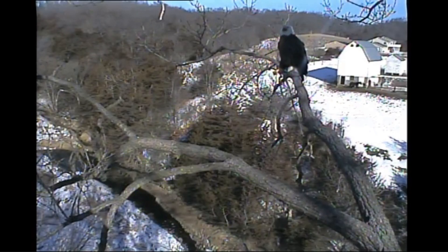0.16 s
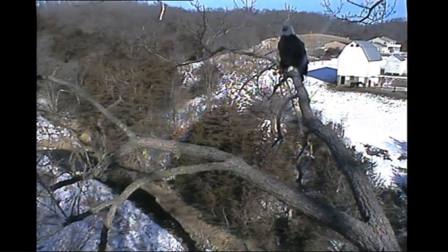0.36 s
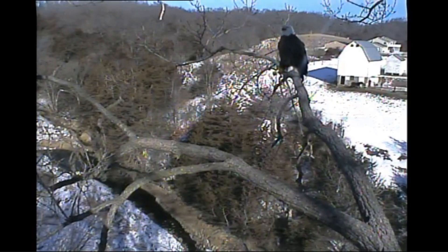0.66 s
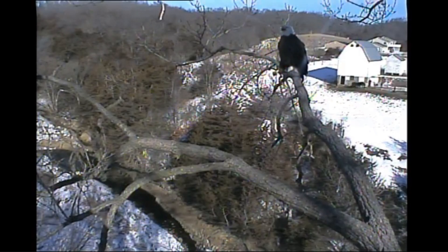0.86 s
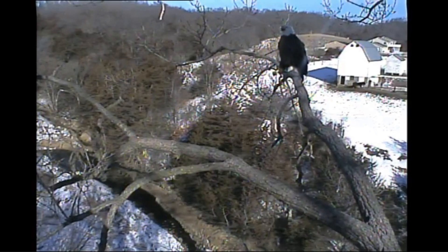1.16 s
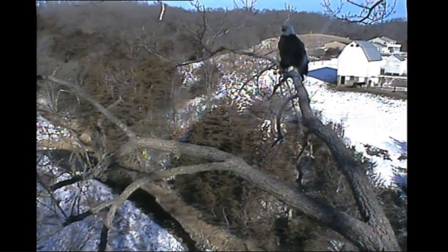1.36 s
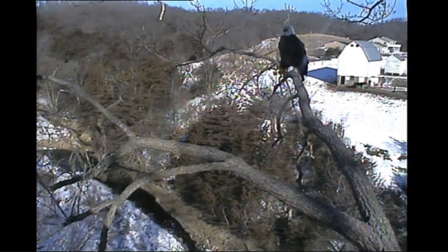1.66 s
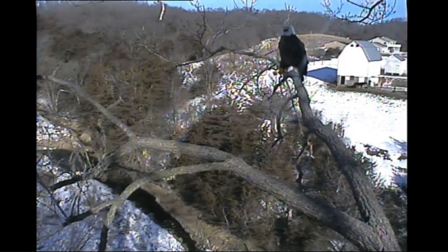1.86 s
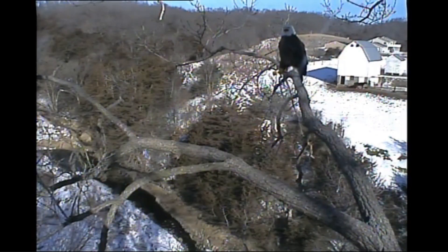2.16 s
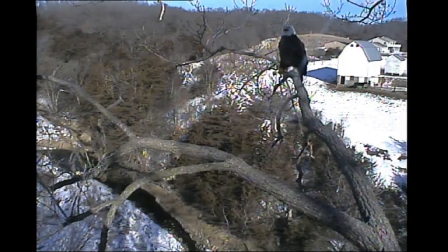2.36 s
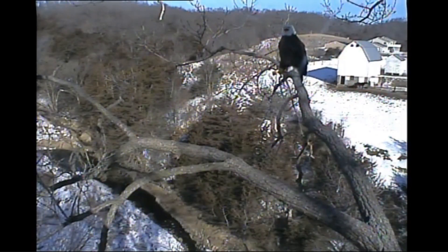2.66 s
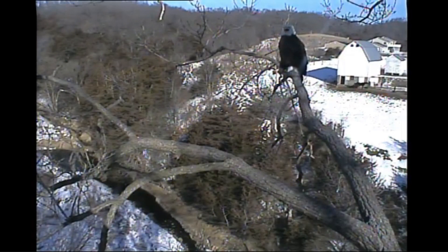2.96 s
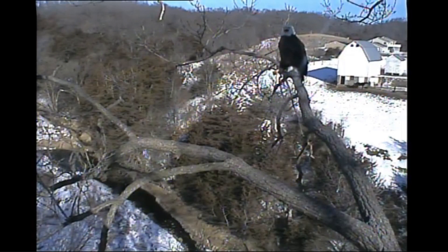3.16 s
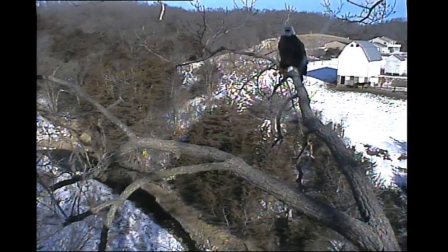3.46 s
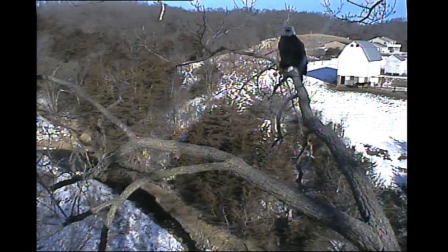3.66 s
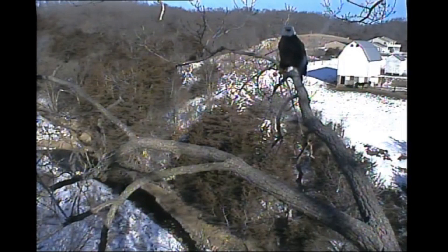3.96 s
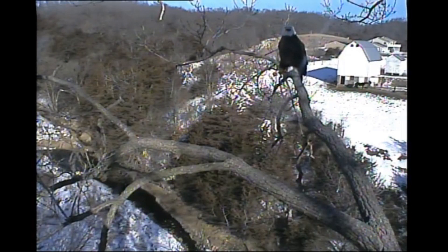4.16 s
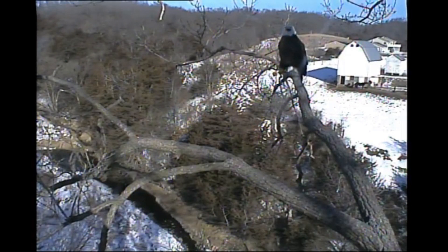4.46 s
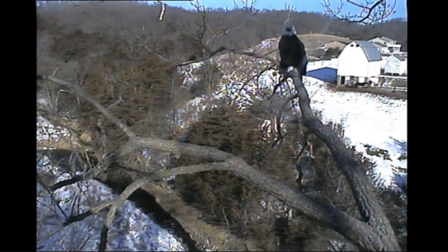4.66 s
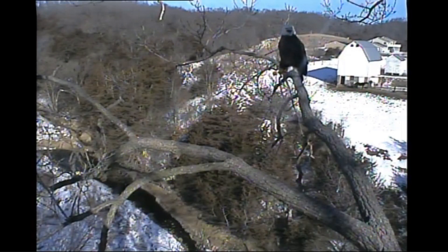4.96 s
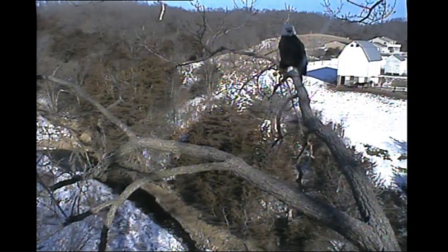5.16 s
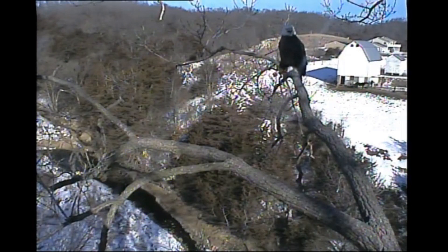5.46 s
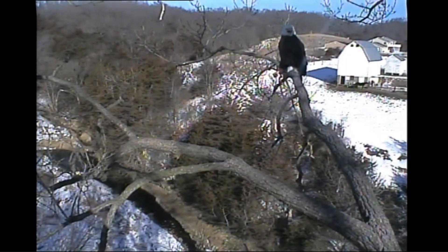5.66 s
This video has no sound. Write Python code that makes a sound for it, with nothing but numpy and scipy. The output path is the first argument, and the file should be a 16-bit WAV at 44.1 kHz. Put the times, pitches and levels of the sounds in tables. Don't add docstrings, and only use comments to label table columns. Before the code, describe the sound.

An eagle close by gives three quick falling series of piercing, cracked yelps over low valley rumble and electrical buzz, with faint distant jays.

```python
import sys
import numpy as np
from scipy import signal
from scipy.fft import rfft, irfft, next_fast_len
from scipy.io import wavfile
from scipy.ndimage import uniform_filter1d, map_coordinates

SR = 44100
rng = np.random.default_rng(int(sys.argv[2]) if len(sys.argv) > 2 else 0)


def attenuation_scalar(level_db):
    decades = np.asarray(level_db, float) / 20
    return 10 ** decades


def persist_wave(psi):
    counts = np.round(np.clip(psi, -1, 1) * 32767).astype(np.int16)
    wavfile.write(sys.argv[1], SR, np.atleast_2d(counts).T)


N = 255780
MAINS_HZ, CAMERA_HZ, STREAM_HZ = 60, 16000, 22050

# freq_hz, density_db_per_hz
VALLEY_SPECTRUM = [(24, -34), (40, -13), (65, -5.5), (138, -13), (175, -11), (280, -4.5), (430, -4.5),
                   (650, -4), (860, -8), (1150, -15.5), (1800, -27.5), (4250, -28), (4750, -24),
                   (5100, -39.5), (6100, -26.5), (7900, -61)]
VALLEY_DB = -38.5
# freq_hz, gain_db
BUZZ_COLOUR = [(40, -16), (60, -4), (120, 9), (420, 14), (1000, 6.5), (3000, -5.5), (4500, 1), (6000, 2),
               (7500, 0)]
# first_s, period_s, level_db
LINE_TICK = (.1175, 1.0834, -8)
# freq_hz, gain_db
TICK_COLOUR = [(200, -10), (1200, 1), (4400, -4.5), (5400, -14)]

# start_s, fall_s, start_hz, end_hz, level_db
JAY_CALLS = [
    (-.015, .088, 757, 639, -46.5),
    (.62, 0.28, 944, 658, -51),
    (1.845, 0.23, 923, 671, -49.5),
    (2.85, 0.26, 932.5, 633, -48),
    (5.43, 0.12, 778, 703, -54),
    (5.535, .118, 700, 578, -54.5),
]
JAY_HARMONICS = [2, 5, 0, 1.5, -13, 1]
# freq_hz, gain_db
JAY_THROAT = [(300, -30), (600, -7), (900, -6), (1500, -13), (2250, -15), (2550, -1), (3100, 0), (3700, -6),
              (4000, -13), (4900, -4), (5500, -18), (7000, -40)]
JAY_ATTACK_S, JAY_TAIL_S, JAY_BEND, JAY_SWELL_DB = 0.059, 0.049, 1.7, 5

# start_s, length_s, start_hz, level_db
DYING_PIPES = [(.001, 0.0098, 3240, -16.5), (.0693, 0.018, 3240, -16.5), (1.028, 0.0056, 3630, -10),
               (1.0336, 0.0077, 3570, -9), (1.0415, 0.0033, 3600, -10), (1.055, 0.0078, 3480, -20),
               (1.0455, 0.0082, 3510, -20), (1.474, 0.01, 3400, -12), (1.485, 0.011, 3466, -17),
               (1.5635, 0.012, 3360, -8), (1.573, 0.0055, 3240, -12.5), (1.6542, 0.021, 3225, -8),
               (2.717, 0.0061, 3280, -10.5), (2.724, 0.011, 3270, -28), (2.9365, 0.0059, 3300, -7.5),
               (2.9444, 0.0046, 3320, -7), (2.9525, 0.009, 3230, -15), (3.058, 0.0046, 3530, -9),
               (3.064, 0.022, 3580, -19), (4.524, 0.0073, 3860, -17), (3.1786, 0.0083, 3340, -9),
               (3.289, 0.0076, 3235, -9.5), (3.396, 0.012, 3177, -13), (4.766, 0.0074, 3240, -14.5),
               (4.882, 0.0047, 3490, -6.5), (4.888, 0.0054, 3420, -13), (4.8959, 0.0055, 3500, -13),
               (5.006, 0.0035, 3285, -0.5), (5.014, 0.013, 3150, -18.5), (5.131, 0.015, 3130, -16.5),
               (5.2645, 0.0073, 3115, -9.5), (5.393, 0.012, 2950, -24)]
# start_s, length_s, start_hz, level_db
HELD_PIPES = [(1.003, .004, 3530, -20), (1.0065, 0.009, 3586, -9.5), (1.0175, 0.0074, 3530, -7.5),
              (1.4402, 0.0096, 3470, -9.5), (1.452, 0.018, 3516, -7.5), (1.549, 0.012, 3405, -8.5),
              (2.7025, 0.012, 3467, -9), (3.147, 0.014, 3430, -11.5), (3.1645, 0.0096, 3360, -8),
              (3.27, 0.016, 3230, -7.5), (3.3845, 0.0091, 3200, -9), (4.5065, 0.0087, 3496, -11.5),
              (4.8655, 0.015, 3475, -8), (4.9786, 0.023, 3346, -10), (5.1139, 0.014, 3244, -9),
              (5.251, .011, 3185, -8.5), (5.3795, 0.011, 3080, -11.5)]
HELD_SAG_HZ_PER_S, HELD_SWELL_DB = 4300, 0
DYING_SAG_HZ_PER_S, DYING_FADE_DB = 4700, 11
# start_s, length_s, level_db
THROAT_CLICKS = [(1.097, 0.0079, -15.5), (1.206, 0.0041, -16), (1.321, 0.01, -23.5), (1.433, 0.0062, -21.5),
                 (1.539, 0.0072, -22), (2.777, 0.0068, -15.5), (2.895, 0.0043, -18.5), (3.019, 0.0047, -21),
                 (3.137, 0.0066, -25), (3.261, 0.0038, -23), (4.584, 0.0032, -21), (4.712, 0.0058, -15.5),
                 (4.842, 0.0047, -22), (4.969, 0.0064, -25.5), (5.105, 0.0079, -28)]
# start_s, start_hz, level_db
VOICE_CRACKS = [(1.0993, 7390, -4), (1.209, 7200, -7), (1.2204, 6930, -9), (1.322, 6770, -9.5),
                (1.336, 6500, -16), (1.438, 4430, -33), (1.547, 4140, -13), (1.653, 4000, -19.5),
                (2.662, 6930, -20), (2.7801, 6850, -6), (2.7935, 6600, -3), (2.8975, 6690, -12),
                (3.018, 5000, -25), (3.145, 4330, -12), (3.268, 4000, -11), (3.382, 4000, -25),
                (4.589, 7050, -2.5), (4.7133, 6015, -12), (4.843, 5240, -17.5), (4.978, 4170, -14),
                (5.113, 4160, -22), (5.247, 3900, -19.5), (5.378, 4020, -26)]
CRACK_S, CRACK_REST_HZ, CRACK_LEFT = 0.0053, 3300, 0.36
# start_s, length_s, middle_hz, end_hz, level_db
HIGH_ARCHES = [(1.1065, 0.012, 5383, 5050, -9), (1.121, 0.011, 5470, 5150, -8),
               (1.2325, .01, 5494, 5330, -7.5), (2.655, .007, 6700, 7000, -28),
               (2.666, 0.0047, 5280, 5300, -18.5), (2.795, .003, 5300, 5250, -15),
               (2.8065, 0.0072, 5440, 5400, -11), (2.9005, .003, 5260, 5300, -16),
               (2.913, 0.0059, 5400, 5300, -17), (3.019, .003, 5300, 5300, -25),
               (4.482, 0.004, 5150, 5150, -14.5), (4.594, .004, 5390, 5420, -11),
               (4.61, 0.01, 5346, 5320, -9.5), (4.7285, 0.0027, 5310, 5470, -13.5)]
# start_s, length_s, middle_hz, end_hz, level_db
MIDDLE_ARCHES = [(1.115, 0.0073, 4330, 4500, -10.5), (1.1325, .016, 4396, 4050, -8.5),
                 (1.212, 0.007, 4380, 4250, -8), (1.2275, 0.0053, 4300, 4500, -9),
                 (1.2433, 0.015, 4420, 4070, -7.5), (1.328, 0.0082, 4300, 4650, -3.5),
                 (1.342, .017, 4540, 4000, -5.5), (2.672, 0.015, 4360, 3920, -11),
                 (2.6896, .014, 4320, 3940, -10), (2.786, 0.0068, 4410, 4270, -11),
                 (2.7985, 0.0078, 4430, 4650, -14), (2.8123, 0.017, 4340, 3910, -8.5),
                 (2.902, .011, 4380, 4540, -11.5), (2.9207, .0145, 4540, 3820, -5.5),
                 (3.0235, .017, 4355, 3900, -9.5), (4.474, 0.0067, 4130, 4450, -13.5),
                 (4.491, 0.0084, 4420, 4230, -9), (4.596, 0.0027, 4110, 4460, -11.5),
                 (4.605, 0.0055, 4320, 4500, -12), (4.6232, .016, 4315, 4000, -10),
                 (4.7183, 0.0099, 4340, 4430, -6), (4.735, 0.015, 4580, 3900, -7),
                 (4.851, 0.018, 4360, 3920, -8)]
MIDDLE_FOOT_HZ, HIGH_FOOT_HZ, ARCH_DB = 4000, 5150, 6
SCOOP_HZ, SCOOP_S, QUICK_S = 400, .0012, .0125
# start_s, length_s, start_hz, end_hz, level_db
REGISTER_SLIDES = [(1.223, 0.0046, 5540, 5200, -2), (1.3377, 0.0053, 5650, 5150, -3),
                   (2.918, 0.0041, 4040, 3600, -1), (3.038, 0.01, 3374, 3790, 2.5),
                   (3.0472, 0.0079, 3760, 3334, -0.5), (4.4667, 0.0059, 5170, 4340, -13.5),
                   (4.486, 0.0047, 4080, 3520, -10), (4.5006, 0.0069, 4310, 3600, -6),
                   (4.512, .011, 4410, 3725, -6.5), (4.598, 0.0056, 6350, 6200, -9),
                   (4.6028, 0.0027, 5560, 4900, -5), (4.729, 0.0046, 4220, 3734, -7.5),
                   (4.75, 0.0078, 3240, 3515, -5.5), (4.759, 0.0054, 3480, 3300, -7)]

# freq_hz, t60_s
WOODS_T60 = [(1000, 0.43), (3000, 1), (6000, 0.33)]
# start_s, length_s, start_hz, end_hz, level_db
BIRD_CHIPS = [(.008, 0.0075, 3500, 3600, -28.5), (0.036, 0.02, 3500, 3370, -32.5),
              (0.058, 0.0082, 4150, 4000, -30.5), (0.202, .014, 3880, 3800, -48),
              (0.589, 0.016, 3750, 4400, -43), (0.608, 0.013, 4380, 3700, -45),
              (0.618, 0.012, 3860, 3800, -45), (0.626, .01, 3550, 3200, -52),
              (.636, 0.031, 2050, 1960, -51), (0.643, 0.013, 3360, 3600, -50), (.67, .01, 3600, 3450, -52),
              (1.752, 0.0089, 3090, 3140, -40), (1.739, 0.016, 2370, 2600, -42),
              (2.597, 0.011, 3450, 3380, -37), (2.613, .012, 3440, 3270, -45),
              (2.452, .016, 3200, 3350, -52), (2.578, 0.014, 1400, 1440, -44),
              (3.816, 0.035, 3350, 2940, -49.5), (4.158, 0.02, 3780, 4420, -44),
              (4.309, .014, 3730, 3690, -48), (4.35, .014, 2950, 2850, -52),
              (4.176, 0.019, 3680, 3500, -45), (4.389, 0.016, 1320, 1330, -37.5),
              (4.454, 0.011, 3170, 3150, -28.5), (5.446, .045, 5500, 5580, -47),
              (5.506, 0.018, 3950, 3820, -43), (5.751, 0.0071, 1120, 1170, -33),
              (5.756, 0.027, 5260, 5100, -47)]
# start_s, length_s, start_hz, end_hz, level_db
FAR_FLOCK = [(0.124, .04, 3400, 3320, -50), (.23, .05, 2850, 2800, -49), (1.87, 0.067, 5600, 5300, -50),
             (1.966, 0.03, 4250, 4430, -40.5), (2.025, 0.019, 4400, 4140, -37),
             (2.036, 0.034, 3800, 3350, -37.5), (2.426, 0.054, 4200, 3200, -51),
             (3.426, 0.11, 3620, 2500, -45.5), (3.786, 0.0296, 3900, 3590, -49),
             (4.227, 0.028, 3800, 3310, -53), (4.296, 0.046, 3850, 3300, -49),
             (4.358, 0.061, 3300, 2480, -47.5)]

# start_s, length_s, overload_db, brightness_db
OVERLOADS = [(1.012, 0.01, -28, -3), (1.1002, 0.044, -23.5, -10), (1.2078, 0.046, -24.5, -6),
             (1.323, 0.036, -27.5, -6), (1.4377, 0.023, -24, 1.5), (1.549, 0.012, -23.5, -1),
             (1.651, 0.012, -38.5, 8), (2.667, 0.014, -25, -8), (2.689, 0.012, -23.5, -11),
             (2.779, 0.045, -22.5, -15), (2.899, 0.036, -24.5, -5.5), (3.018, 0.037, -25.5, -6.5),
             (3.148, 0.023, -26, 1), (3.265, 0.022, -33, 1), (3.384, 0.016, -43.5, 7),
             (4.472, 0.047, -30.5, -6), (4.587, 0.048, -24.5, -13), (4.713, 0.038, -28, -4),
             (4.848, 0.029, -24, -9), (4.978, 0.031, -28, 3), (5.1173, 0.01, -24.5, 2.5),
             (5.255, 0.0088, -42, 17.5), (5.378, 0.0088, -34, -2)]
# freq_hz, density_db_per_hz
HASH_SPECTRUM = [(900, -12), (1200, -3.5), (2500, -0.5), (4000, 5), (5500, -4.5), (6500, -17)]
# freq_hz, density_db_per_hz
THUMP_SPECTRUM = [(20, -44), (60, 9), (200, 4.5), (600, 5), (1100, 0.5), (1500, -12.5)]
# freq_hz, density_db_per_hz
SIZZLE_SPECTRUM = [(5000, -23), (5800, -2.5), (6600, 9), (7400, 2), (7900, -22)]
THUMP_DB = -4.5


def unit(x):
    return x / np.sqrt(np.mean(x ** 2) + 1e-20)


def along(points, hz):
    f, v = np.transpose(points)
    return np.interp(np.log(hz + 1), np.log(f + 1), v)


def coloured(x, spectrum, rate_hz=SR):
    m = next_fast_len(len(x) + 8192)
    gain = attenuation_scalar(along(spectrum, np.fft.rfftfreq(m, 1 / rate_hz)))
    return irfft(rfft(x, m) * gain, m)[:len(x)]


def wobble(rate_hz):
    knots = rng.standard_normal(int(N * rate_hz / SR) + 4)
    return map_coordinates(knots, [np.arange(N) * rate_hz / SR])


def whistle(rows, edge_s, jitter_hz, scoop_hz=0):
    out = np.zeros(N + SR)
    shake_hz = jitter_hz * np.pad(wobble(600), (0, SR))
    for s, length, start, middle, end, db0, db1 in rows:
        i = round(s * SR)
        t = np.arange(round((length + edge_s) * SR)) / SR
        u = t / length
        hz = start + (4 * middle - 3 * start - end) * u + 2 * (start + end - 2 * middle) * u * u
        hz = hz - scoop_hz * np.exp(-t / SCOOP_S) + shake_hz[i:i + len(t)]
        fade = np.sin(np.pi / 2 * np.clip(np.minimum(t, t[-1] - t) / edge_s, 0, 1))
        phase = 2 * np.pi * (np.cumsum(hz) / SR + rng.random())
        out[i:i + len(t)] += attenuation_scalar(db0 + (db1 - db0) * u ** 1.23) * fade * np.sin(phase)
    return out[:N]


def straight(rows):
    return [(s, d, a, (a + b) / 2, b, db, db) for s, d, a, b, db in rows]


def valley():
    z = signal.stft(rng.standard_normal(N), nperseg=512)[2]
    field = uniform_filter1d(rng.standard_normal(z.shape), 6, 0)
    field = uniform_filter1d(field, 10, 1)
    noise = signal.istft(z * attenuation_scalar(0.19 * unit(field)), nperseg=512)[1][:N]
    return attenuation_scalar(VALLEY_DB) * unit(coloured(noise, VALLEY_SPECTRUM))


def mains():
    t, spikes, ticks = np.arange(N) / SR, np.zeros(N), np.zeros(N)
    count = np.arange(int(2 * MAINS_HZ * N / SR))
    when = np.round((.0041 + count / (2 * MAINS_HZ)) * SR).astype(int)
    spikes[np.minimum(when, N - 1)] = (-1.) ** count * attenuation_scalar(2.2 * rng.standard_normal(len(count)))
    first_s, period_s, tick_db = LINE_TICK
    ticks[np.round(np.arange(first_s, N / SR, period_s) * SR).astype(int)] = attenuation_scalar(tick_db)
    hum = attenuation_scalar(-55.5) * np.sin(2 * np.pi * MAINS_HZ * t)
    whine = attenuation_scalar(-53 + 1.2 * wobble(40)) * np.sin(2 * np.pi * 77 * MAINS_HZ * t)
    return hum + attenuation_scalar(-22.0) * coloured(spikes, BUZZ_COLOUR) + whine + coloured(ticks, TICK_COLOUR)


def jay():
    t, out = np.arange(N) / SR, np.zeros(N)
    breath = .42 * unit(coloured(rng.standard_normal(N), JAY_THROAT))
    for s, fall, start, end, call_db in JAY_CALLS:
        live = (t >= s) & (t < s + fall + JAY_TAIL_S)
        age_s = t[live] - s
        u = np.clip(age_s / fall, 0, 1)
        envelope_db = np.interp(age_s, [0, JAY_ATTACK_S, fall, fall + JAY_TAIL_S], [-3, -1.5, -3.0, -32])
        level_db = call_db + JAY_SWELL_DB * u + envelope_db
        hz = (start - (start - end) * u ** JAY_BEND) * (1 + .009 * wobble(100)[live])
        phase = 2 * np.pi * np.cumsum(hz) / SR
        stack = np.zeros(len(hz))
        for k, db in enumerate(JAY_HARMONICS, 1):
            throat_db = along(JAY_THROAT, k * hz * (930 / start) ** .3)
            stack += attenuation_scalar(db + throat_db + 2.4 * wobble(45)[live]) * np.sin(k * phase)
        out[live] += attenuation_scalar(level_db + 5.5) * (stack + breath[live])
    return out


def pipes(rows, sag_hz_per_s, change_db):
    def push(db):
        return db + 2.0 + 0.66 * max(db + 14.0, 0)
    return [(s, d, hz, hz - sag_hz_per_s * d / 2, hz - sag_hz_per_s * d, push(db), push(db + change_db))
            for s, d, hz, db in rows]


def crack_strokes():
    def drop(hz, left):
        return CRACK_REST_HZ + left * (hz - CRACK_REST_HZ)
    return [(s, CRACK_S, hz, drop(hz, (1 + CRACK_LEFT) / 2), drop(hz, CRACK_LEFT), db, db)
            for s, hz, db in VOICE_CRACKS]


def arches(rows, foot_hz):
    return [(s, d, foot_hz, middle, end, db + ARCH_DB, db + ARCH_DB) for s, d, middle, end, db in rows]


def eagle():
    piped = pipes(DYING_PIPES, DYING_SAG_HZ_PER_S, -DYING_FADE_DB)
    piped += pipes(HELD_PIPES, HELD_SAG_HZ_PER_S, HELD_SWELL_DB)
    gulps = [(s, d, 750, 700, 620, db, db) for s, d, db in THROAT_CLICKS]
    quick = arches([row for row in MIDDLE_ARCHES if row[1] < QUICK_S], MIDDLE_FOOT_HZ)
    slow = arches([row for row in MIDDLE_ARCHES if row[1] >= QUICK_S], MIDDLE_FOOT_HZ)
    high = arches(HIGH_ARCHES, HIGH_FOOT_HZ) + straight(REGISTER_SLIDES)
    arcs = whistle(quick, edge_s=0.0011, jitter_hz=87, scoop_hz=SCOOP_HZ)
    arcs += whistle(slow + high, edge_s=0.001, jitter_hz=67.4)
    flutter = attenuation_scalar(3 * wobble(600))
    rough = attenuation_scalar(9 * wobble(1500) - 5) * whistle(crack_strokes(), edge_s=.0012, jitter_hz=450)
    steady = whistle(piped, edge_s=0.0026, jitter_hz=56.5)
    return flutter * arcs + steady + rough + whistle(gulps, edge_s=0.0039, jitter_hz=154)


def branches(x):
    t = np.arange(SR // 20) / SR
    tail = rng.standard_normal(len(t)) * attenuation_scalar(-60 * t / 0.076)
    return signal.fftconvolve(x, tail / np.linalg.norm(tail))[:N]


def woods(x):
    out, size = np.zeros(N + SR), 5000
    for i in range(0, N, size):
        hz, t, z = signal.stft(rng.standard_normal(SR // 2), SR, nperseg=256)
        clump_db = 11 * uniform_filter1d(rng.standard_normal(len(t)), size=5)
        clump_db -= 15 * np.clip((t - .105) / .03, 0, 1)
        decay = attenuation_scalar(-60 * t / along(WOODS_T60, hz)[:, None])
        tail = signal.istft(z * attenuation_scalar(clump_db) * decay, SR, nperseg=256)[1]
        echo = signal.fftconvolve(x[i:i + size], tail / np.linalg.norm(tail))
        out[i:i + len(echo)] += echo
    return out[:N]


def small_birds():
    chips = whistle(straight(BIRD_CHIPS), edge_s=.006, jitter_hz=95)
    return chips + whistle(straight(FAR_FLOCK), edge_s=0.018, jitter_hz=454)


def scene():
    far = jay() + small_birds()
    call = eagle()
    near = call + attenuation_scalar(-13.5) * branches(call)
    echoed = attenuation_scalar(-24.3) * call + attenuation_scalar(-10) * far
    return (near + far + woods(echoed) + valley() + mains())[None]


def clipped(x, top, hard):
    return x / (1 + np.abs(x / top) ** hard) ** (1 / hard)


def overload(size):
    t, out = np.arange(size) / CAMERA_HZ, np.zeros(size)
    for k, spectrum in enumerate((HASH_SPECTRUM, THUMP_SPECTRUM, SIZZLE_SPECTRUM)):
        gate = np.zeros(size)
        for s, d, db, bright_db in OVERLOADS:
            band_db = db + (0, THUMP_DB, bright_db)[k]
            ramp = np.minimum((t - s) / 0.0009 + 1, (s + d - t) / 0.0035 + 1)
            gate += attenuation_scalar(band_db) * np.clip(ramp, 0, 1)
        bursts = attenuation_scalar(24 * uniform_filter1d(rng.standard_normal(size), size=24))
        crackle = rng.standard_normal(size) * bursts
        out += attenuation_scalar(3.5) * gate * unit(coloured(crackle, spectrum, CAMERA_HZ))
    return out


def restep(x, from_hz, to_hz, size):
    return np.interp(np.arange(size) / to_hz, np.arange(len(x)) / from_hz, x)


def low_pass(x):
    return signal.sosfilt(signal.butter(12, 17140, fs=SR, output="sos"), x)


def record(dry):
    x = signal.resample_poly(dry[0], 160, 441)
    x = clipped(x, top=np.where(x > 0, .45, .29), hard=3.4) + overload(len(x))
    step = uniform_filter1d(np.abs(x), size=96)
    x = x + attenuation_scalar(-16) * step * rng.standard_normal(len(x))
    x = clipped(x, top=.6, hard=5)
    x = coloured(x, [(20, -29), (50, -3.0), (7000, -0.5), (7500, -0.5), (7800, -4.5), (8000, -5.5)], CAMERA_HZ)
    x = restep(x, CAMERA_HZ, STREAM_HZ, N // 2 + 1)
    x = restep(x, STREAM_HZ, SR, N)
    x = coloured(x, [(8000, -0.38), (12000, 0.01), (15000, -0.5)])
    x = coloured(x, [(15780, 0), (15950, -36)])
    return low_pass(x[None])


dry = scene()
out = record(dry)
persist_wave(out)
```